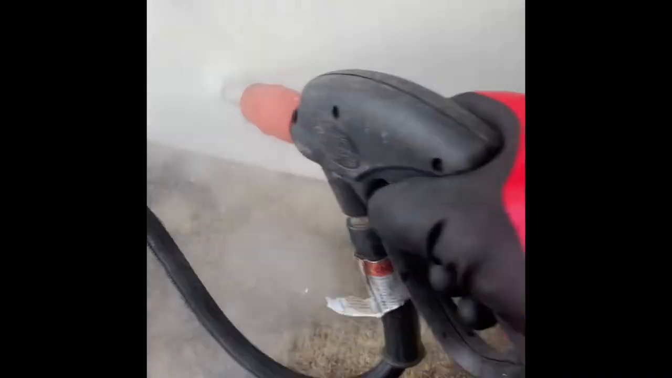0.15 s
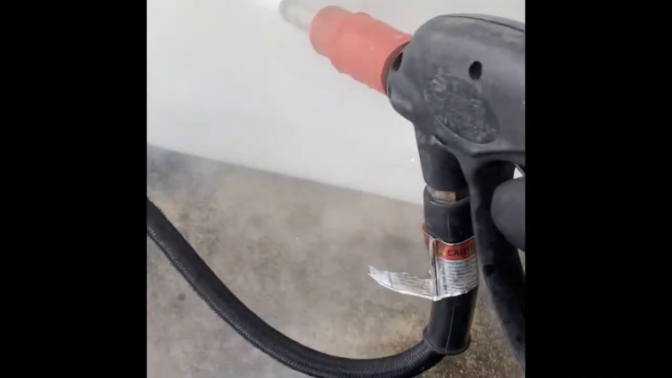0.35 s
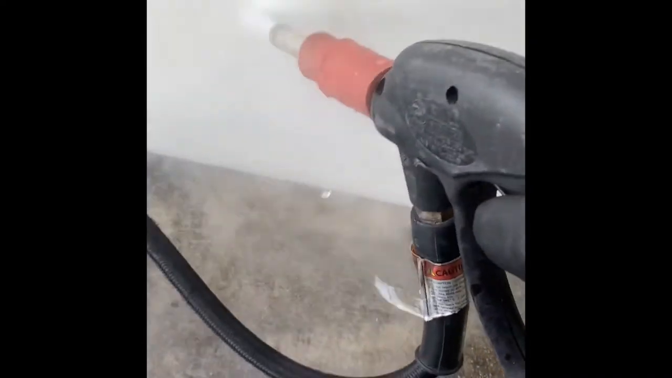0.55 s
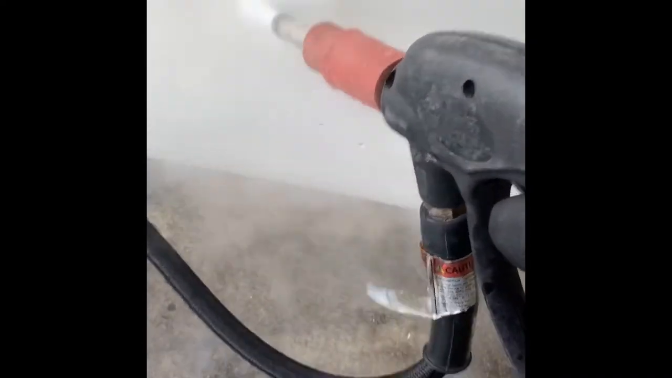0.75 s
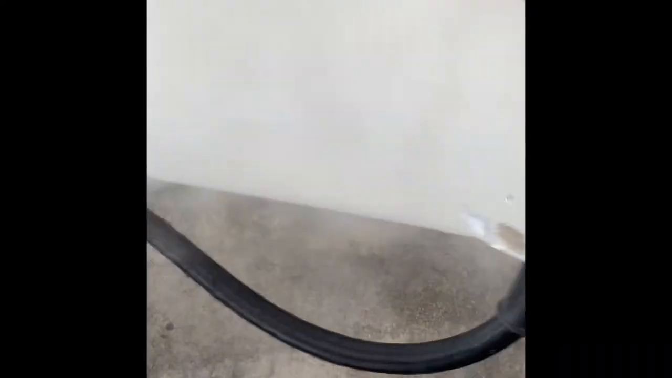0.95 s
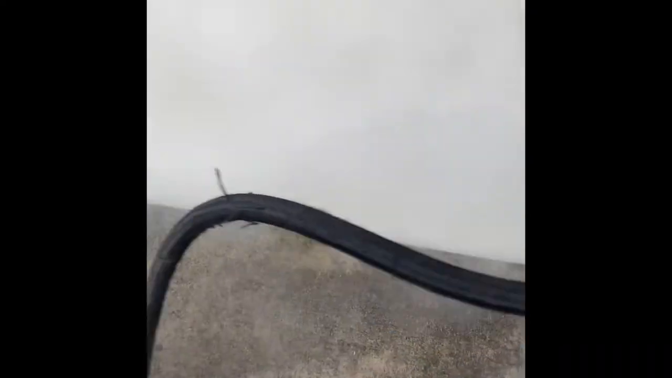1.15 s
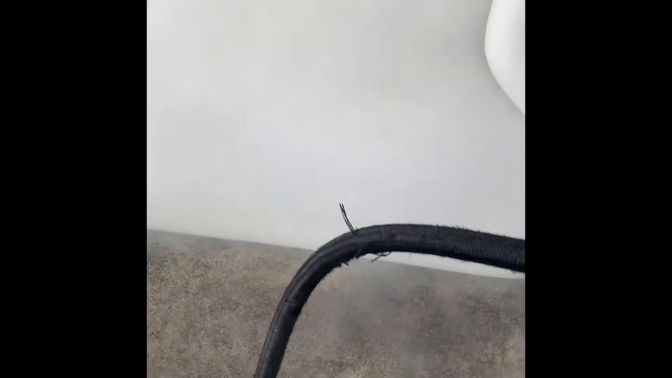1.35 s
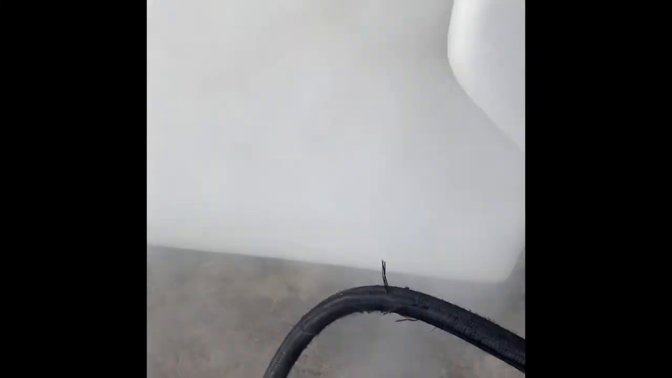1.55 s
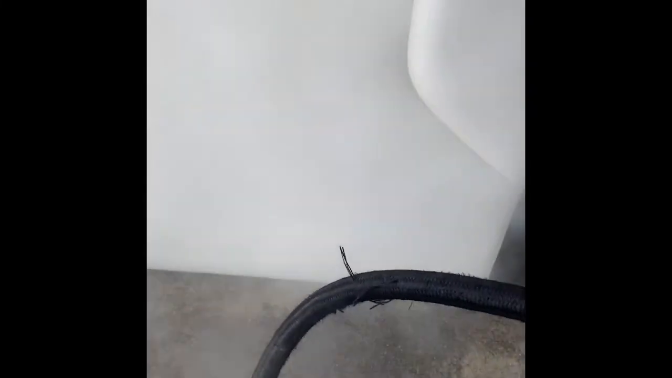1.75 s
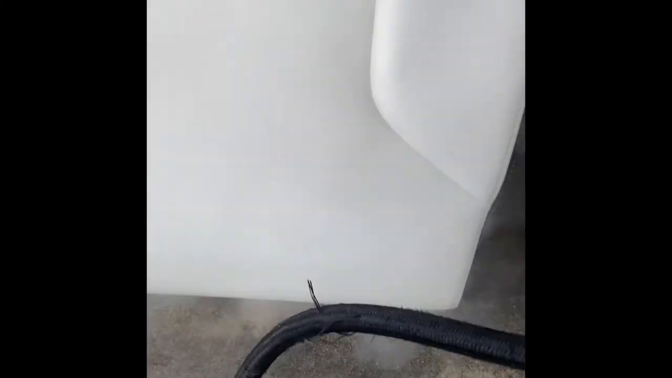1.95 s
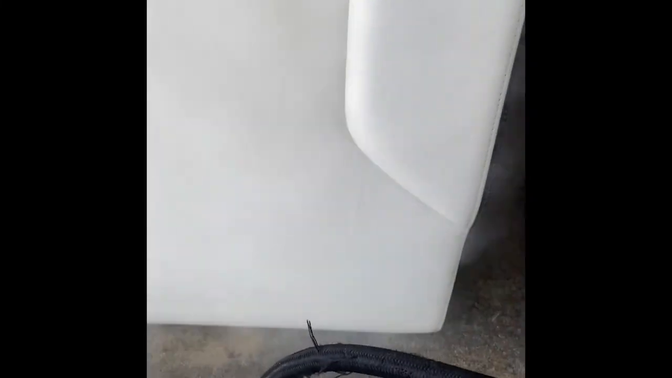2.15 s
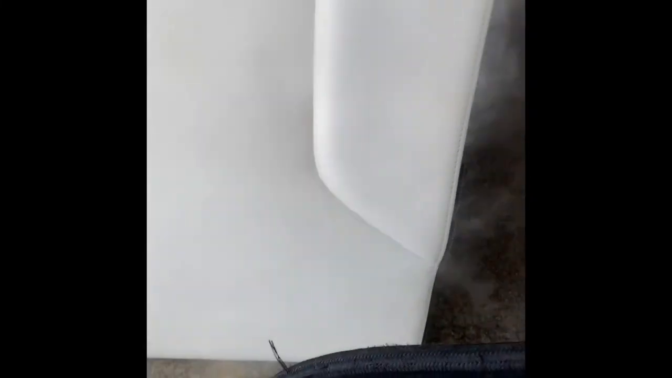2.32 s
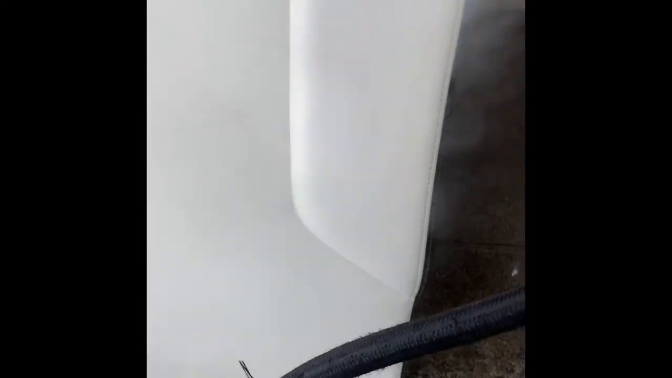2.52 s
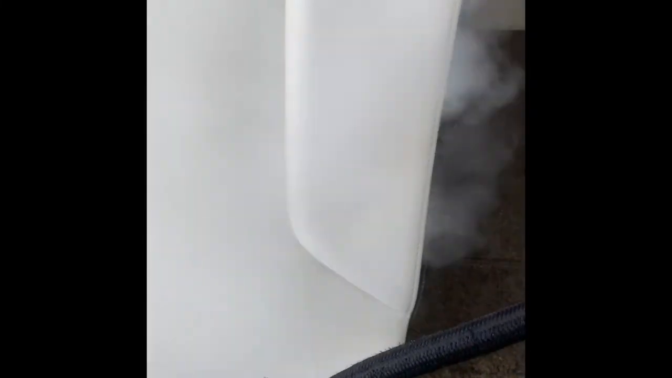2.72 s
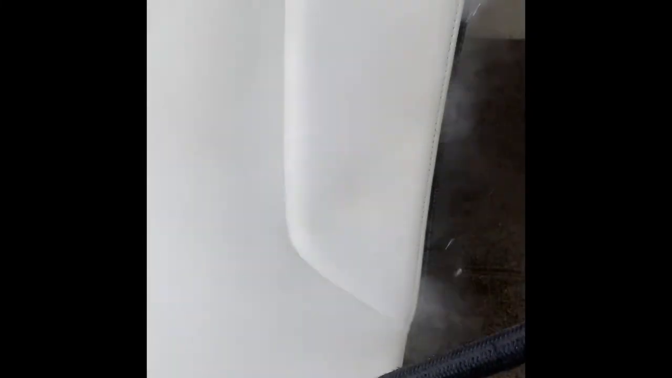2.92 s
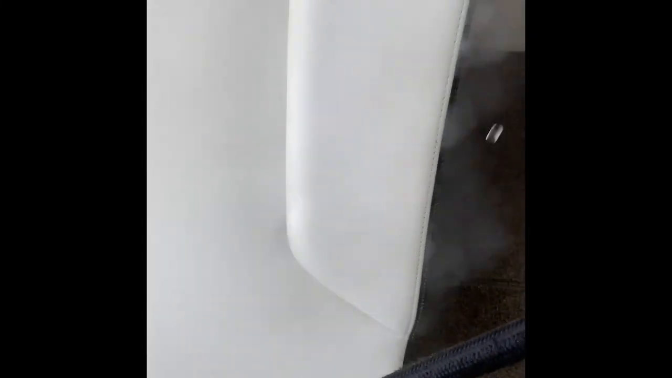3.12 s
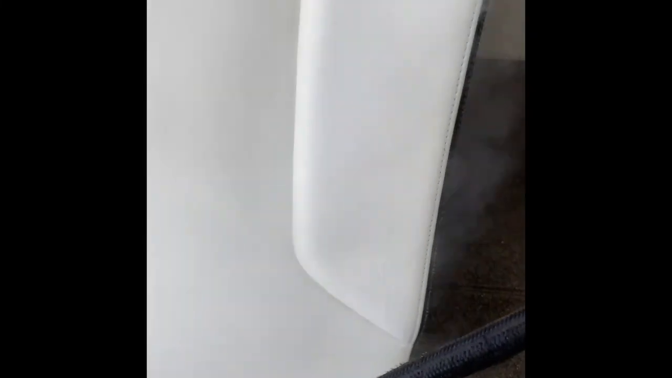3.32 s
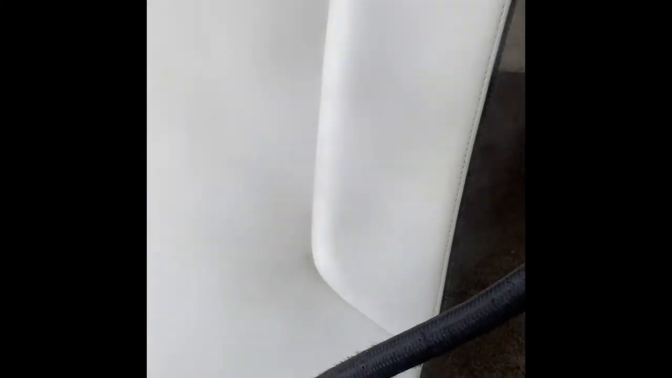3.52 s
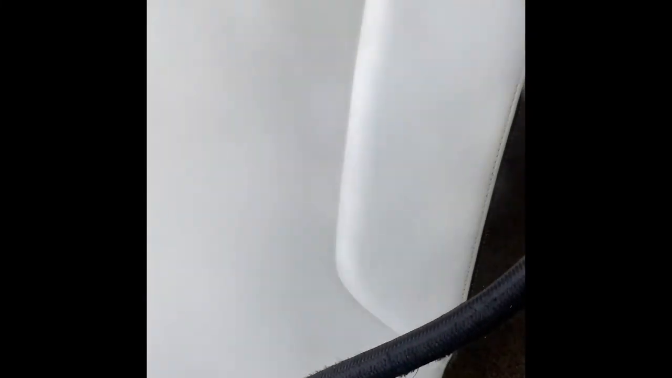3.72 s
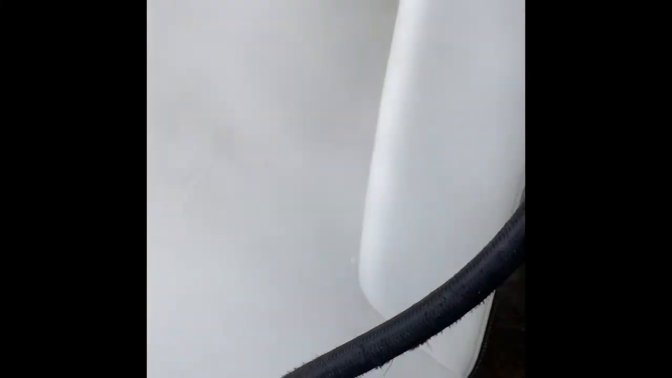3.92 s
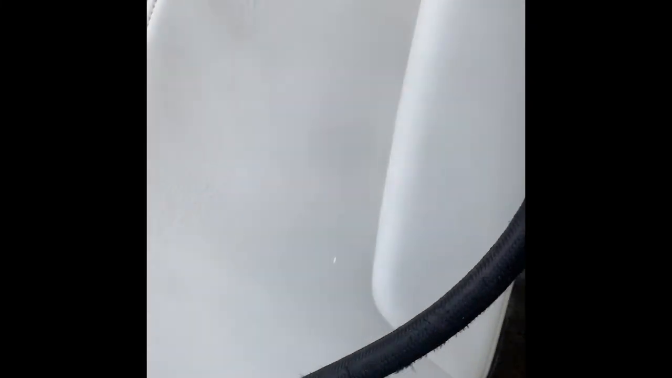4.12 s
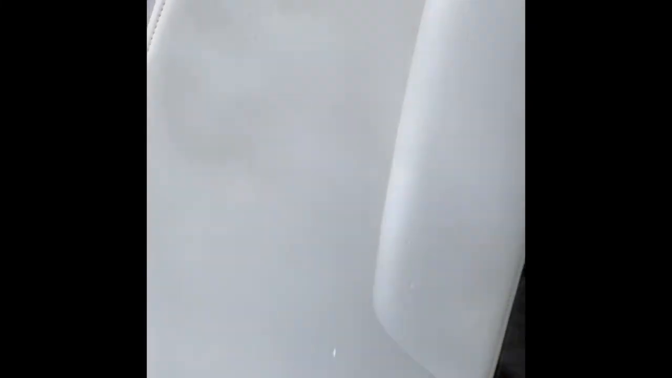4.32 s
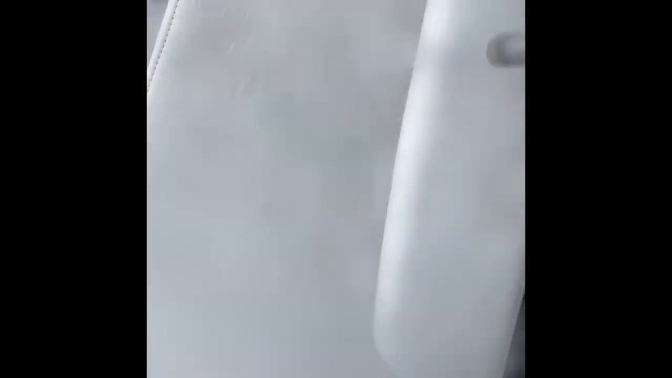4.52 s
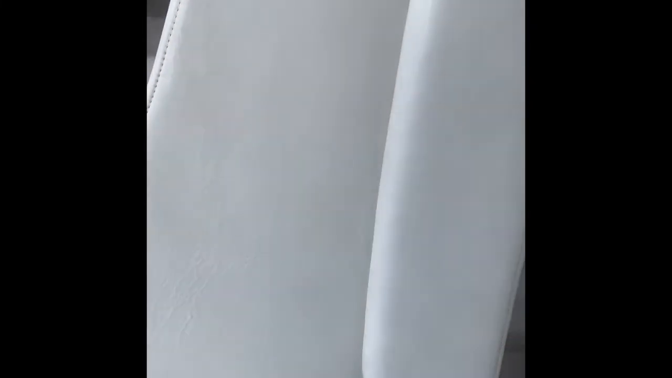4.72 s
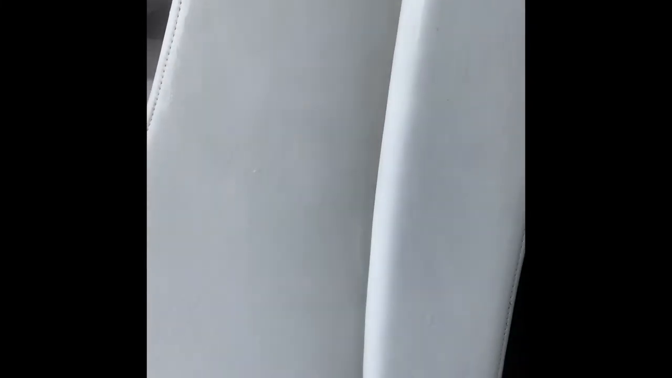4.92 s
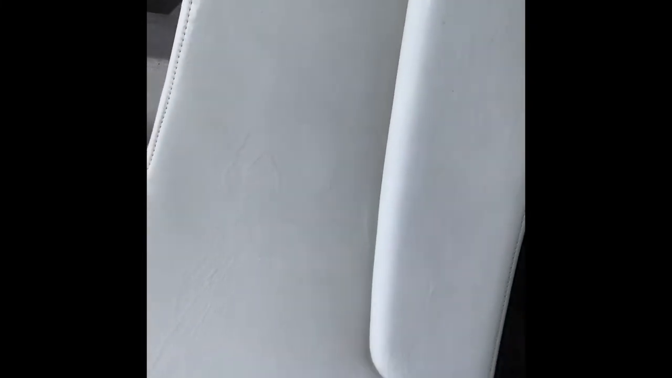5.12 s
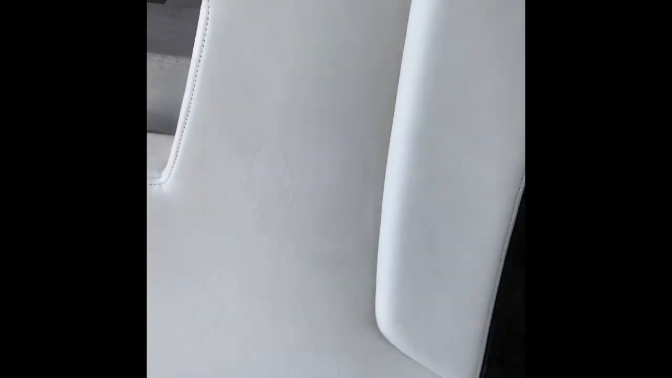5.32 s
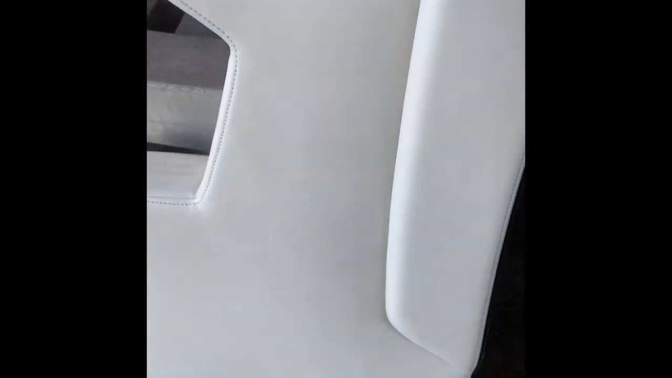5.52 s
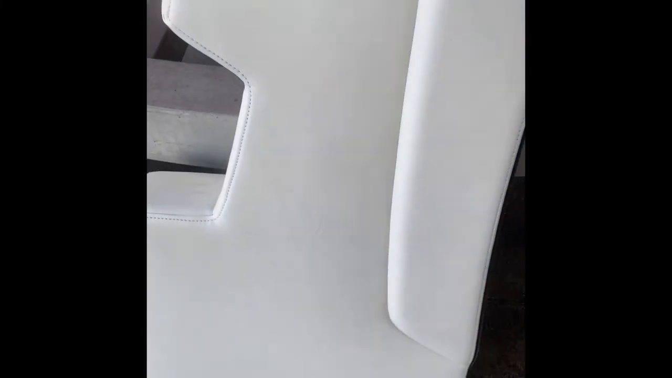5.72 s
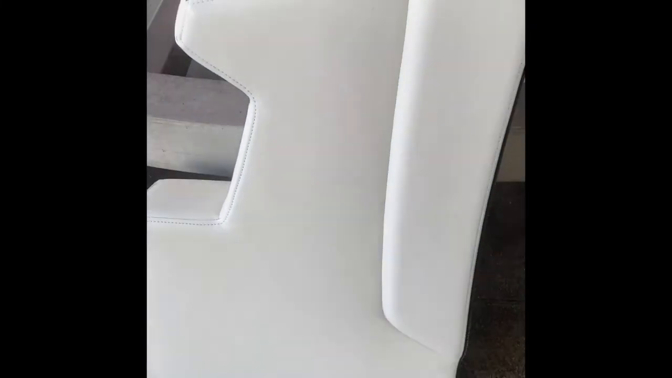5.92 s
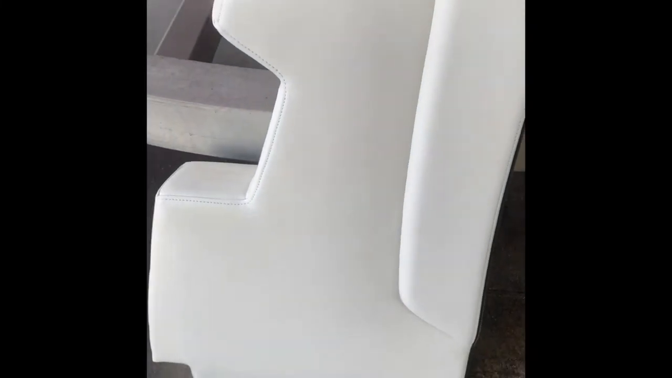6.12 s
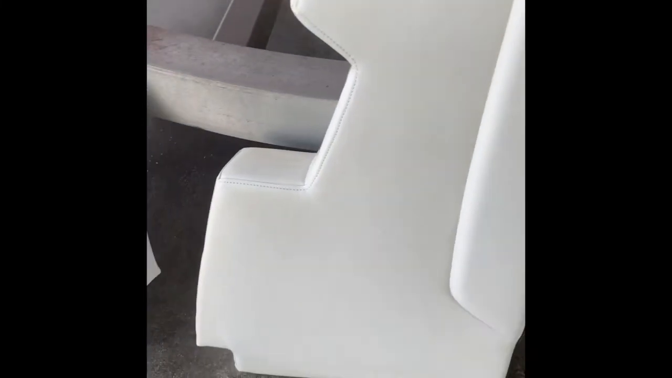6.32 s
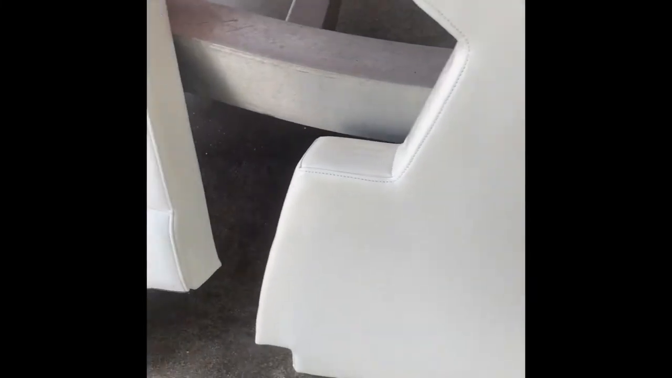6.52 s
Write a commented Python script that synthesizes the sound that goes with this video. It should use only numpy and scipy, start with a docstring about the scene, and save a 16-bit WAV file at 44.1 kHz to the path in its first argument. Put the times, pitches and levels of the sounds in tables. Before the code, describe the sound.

Harsh pressurised steam sprays against a padded panel, wavering and growing duller, then abruptly stops; a quiet yard with distant machine rumble and handling knocks remains.

```python
"""A steam jet hisses, sizzles and splashes on a padded panel close to a moving phone, until its valve shuts.
The jet is white noise shaped into bands, with shifting patches, bright bands and two reflections.
Its spreading cloud adds a dull roar. Short rings with noise cracks make the puffs, ticks and knocks.
Behind it all, a machine's rumble and the yard sound are coloured noise that wavers; faint rustles
are swells of such noise."""
import sys
import numpy as np
from scipy import signal
from scipy.fft import rfft, irfft
from scipy.io import wavfile
from scipy.ndimage import uniform_filter1d, map_coordinates

SR = 44100
rng = np.random.default_rng(int(sys.argv[2]) if len(sys.argv) > 2 else 0)


def inscribe(sig):
    """Save sig as 16-bit PCM at rate SR to the path in sys.argv[1].

    A 1-D sig is mono; a 2-D sig holds one channel per row.
    Samples are clipped to [-1, 1] before scaling.
    """
    pcm = np.round(np.clip(np.atleast_2d(sig).T, -1, 1) * 32767)
    wavfile.write(sys.argv[1], SR, pcm.astype(np.int16))


N = 293485
WIN, HOP = 1024, 128  # short-time spectrum: window and step in samples
SHUT_S = 4.4706  # when the valve starts to shut, in seconds

# How far diffuse yard sound differs between the two ports of the phone.
# Each row: frequency in Hz, relative strength of the difference in dB.
YARD_SIDE = [(100, 4.5), (450, 6.5), (700, 13), (1500, 9), (1750, -0.5), (2000, -2.5), (2400, 3.5),
             (4000, 5)]


def jet():
    """Turbulent steam is broad noise; reflections and the shutting valve shape it on its way to two ports."""
    # Colour of the phone's ports. Each row: frequency in Hz, gain in dB.
    port_colour = [(30, -9), (100, 0.5), (160, 2), (280, 0), (450, -0.5), (650, 3), (1000, -1.5), (2200, 0),
                   (2700, 0), (3300, -0.5), (4900, 0.5), (5600, 3.5), (9000, 5.5), (12000, 4.5),
                   (14000, 4.5), (16000, 3)]
    hz, s, common = frames()
    left, right = frames()[2], frames()[2]
    power = jet_power(hz, s)
    patchy_db = drifting(hz, s)
    patchy_db = patchy_db + 1.3 * patches(power.shape, 29.0, 300.0)
    # quick wide flutter from wet slugs in the flow
    patchy_db = patchy_db + 0.9 * patches(power.shape, 25.0, 4200.0)
    colour_db = across(hz, port_colour)[0] + patchy_db + slides(hz, s)
    gain = np.sqrt(power) * undb(colour_db) * valve(s) * reflections(hz, s)
    return sound(gain * two_ports(hz, s, common, left, right))


def jet_power(hz, s):
    """Splits the jet into hiss, sizzle, splash, wash, roar and buffet, each a bell-shaped band of noise."""
    # The jet as gun and phone move. Each row: time in seconds, centre of the hiss in Hz,
    # then the relative levels of hiss, sizzle and splash in dB.
    motion = [(0.0, 6660, -35.5, -37.5, -44), (0.23, 7500, -46, -35, -41), (0.39, 7650, -37, -33.5, -38),
              (0.45, 7300, -31, -38, -43.5), (0.62, 8160, -39, -36.5, -39.5), (0.75, 7800, -34, -35, -41),
              (0.95, 7160, -31, -33, -37), (1.19, 7450, -25.5, -32.5, -33.5),
              (1.22, 7200, -31.5, -35.5, -37.5), (1.29, 7700, -55, -33.5, -40),
              (1.4, 7850, -29, -35, -34.5), (1.65, 5900, -28, -31.5, -36.5),
              (1.87, 6300, -34, -34.5, -34.5), (2.04, 7000, -30, -31.5, -34.5),
              (2.5, 6600, -36.5, -34.5, -37.5), (2.71, 6750, -26, -37, -36), (2.8, 6800, -34.5, -35, -37.5),
              (3.17, 7200, -35.5, -34.5, -36.5), (3.5, 6460, -36.5, -31.5, -37),
              (3.71, 6900, -26.5, -37, -38.5), (3.8, 6200, -34.5, -31.5, -37),
              (4.08, 6800, -32.5, -34, -39), (4.3, 6850, -29, -33.5, -32), (4.37, 7000, -31.5, -34, -37),
              (4.49, 7840, -28, -28.5, -40.5)]
    # Steam cloud spreading round the panel. Each row: time in seconds, thickness from 0 to 1.
    cloud_table = [(0, 0.17), (.9, 0), (1.5, 0.17), (1.75, 0.31), (2.25, 0.16), (2.75, 0.48), (3.3, 0.97),
                   (4.1, 0.95), (4.45, 0.72)]
    hiss_hz, hiss_db, sizzle_db, splash_db = over_time(s, motion)
    cloud = over_time(s, cloud_table)[0]
    since = s - SHUT_S
    sizzle_db = sizzle_db + ramp(since, 0.061, 0.25, 0, -4.5)  # falls further during the dribble
    # the wash also rises and falls with the splash, 0.39 dB for each dB
    wash_db = between((-50, -39), cloud) + 0.39 * (splash_db - splash_db.mean())
    roar_db = between((-64, -47.5), cloud)
    # Each row: centre in Hz, width in octaves, relative level in dB, further change in dB on shutting.
    bands = [(hiss_hz, 0.33, hiss_db - 5.5, -17),
             (10500, 0.45, sizzle_db + 3, 3.5),
             (3600, 0.45, splash_db + 3, 4.5),
             (1500, 0.5, wash_db + 1, -4),
             (230, 1.1, roar_db + 1.5, -11),
             (68, 0.42, roar_db - 5.5, -10.5)]  # buffet: slow eddies that come with the roar
    power = 0
    for centre_hz, octaves, level_db, shut_db in bands:
        power = power + band(hz, centre_hz, octaves, level_db + ramp(since, 0, 0.061, 0, shut_db))
    return power


def valve(s):
    """Shutting the valve gives a quick drop, a short dribble from the nozzle and a fading tail."""
    # Each row: seconds since the valve starts to shut, gain in dB.
    shut_off = [(0, 0), (.05, -17), (.1, -25.5), (.135, -29), (.165, -39.5), (.28, -49.5), (.32, -55),
                (.55, -70)]
    since = s - SHUT_S
    return undb(over_time(since, shut_off)[0]) * (since < shut_off[-1][0])


def two_ports(hz, s, common, left, right):
    """Sound shared by left and right has a phase lead on one side; the rest differs from side to side."""
    # The likeness of left and right. Each row: frequency in Hz, shared part of the power (0 to 1) before # and
    # after the phone turns, phase lead of the left in radians before and after the turn, # left minus right
    # level in dB.
    likeness = [(60, .95, .62, -.5, 0, -1.5), (142, .8, .6, -.5, 0, -3), (295, .88, .95, -.8, 0, -1),
                (430, .35, .8, -1.7, 0, -2), (550, .2, .8, -2.3, -.4, -2.5),
                (700, .2, .62, -2.4, -.5, -2.5), (950, .15, .45, -2.3, .2, -1), (1300, .4, .75, 0, .2, 0),
                (1800, .5, .9, .45, .2, .5), (2350, .4, .45, .8, .5, 0), (2850, .5, .2, 3.6, 3.1, -1.5),
                (3300, .45, .12, 3.9, 3.1, -1.5), (3900, .15, .3, 1.5, 1.1, -1.5),
                (4500, .4, .4, 1.9, 1.4, -1), (5000, .35, .05, -1.5, -.5, -.5),
                (5500, .82, .68, .1, .35, -.5), (6200, .84, .77, .5, .6, 0), (7600, .77, .7, 1.15, 1.2, .5),
                (8500, .79, .74, 1.6, 1.7, .5), (10500, .78, .74, 2.3, 2.4, 1.5),
                (11500, .82, .85, 2.8, 2.9, 0)]
    # The same columns for the top, where left and right are of opposite sign.
    opposed = [(12300, .995, .995, .97 * np.pi, .97 * np.pi, 0), (13000, 1, 1, np.pi, np.pi, 0),
               (20000, 1, 1, np.pi, np.pi, 0)]
    swing = np.interp(s, (2.0, 2.65), (0, 1))  # the phone turns
    early, late, lead_early, lead_late, pan_db = across(hz, likeness + opposed)
    share = np.clip(between((early, late), swing), 0, 1)
    turn = np.exp(0.5j * between((lead_early, lead_late), swing))
    left_port = np.sqrt(share) * turn * common + np.sqrt(1 - share) * left
    right_port = np.sqrt(share) / turn * common + np.sqrt(1 - share) * right
    return np.array([undb(pan_db / 2) * left_port, undb(-pan_db / 2) * right_port])


def reflections(hz, s):
    """Two delayed copies carve comb-like teeth into the spectrum, which glide as the delays change."""
    # Reflections off panel and floor as the phone moves. Each row: time in seconds, near delay
    # in milliseconds, near strength (0 to 1), far delay in milliseconds, far strength (0 to 1).
    echo = [(0, 0.7, 0.3, 3.7, 0.1), (.12, 0.98, 0.05, 2.1, 0.15), (.25, 1.14, 0.05, 2.5, 0.1),
            (.39, .85, 0.2, 2.3, 0.08), (.55, .8, 0.15, 2.4, .08), (0.73, 0.95, 0.1, 2.4, .08),
            (.95, 1.18, 0.12, 2.1, 0.06), (1.2, 1.3, 0.05, 2, 0.06), (1.24, .38, 0, 1.9, 0),
            (1.5, 0.41, 0.1, 2.2, 0.15), (1.7, 0.44, 0.15, 2.1, 0.15), (2.3, 0.53, 0, 2, 0.03),
            (2.6, 0.29, 0.06, 4, 0.15), (3.7, 0.29, 0.2, 5.9, 0.15)]
    near_ms, near, far_ms, far = over_time(s, echo)
    cycle = -2j * np.pi * hz[:, None] / 1000  # phase per millisecond of delay
    combed = 1 + near * np.exp(cycle * near_ms) + far * np.exp(cycle * far_ms)
    return combed / np.sqrt(1 + near ** 2 + far ** 2)


def slides(hz, s):
    """Bright bands and hollows fade in and out of the jet, some gliding in pitch; in dB."""
    # Each row: start and end in seconds, first and last frequency in Hz, width in Hz, lift in dB
    # (below 0 is a hollow). Equal start and end leave no band; an end before the start runs it backwards.
    glides = [(-.2, 0.97, 454, 460, 45, -16), (0.2028, 0.898, 1554, 1560, 88.7, -5.5),
              (-0.1, .3, 6200, 5640, 180, 7.5), (-0.5, 0.21, 9500, 8000, 300, 4),
              (0.05, 0.22, 8200, 6400, 280, 5), (0, 0.3, 10300, 10700, 220, 4),
              (.3, 0.43, 10800, 10100, 250, 4.5), (.2, .36, 9200, 9200, 250, 4),
              (.24, 0.433, 8440, 7700, 320, 5), (.3, 0.521, 7800, 6300, 300, 0.5),
              (0.438, 0.65, 7820, 8300, 300, 8), (0.7, .7, 8700, 8400, 280, 5.5),
              (0.422, 0.682, 10800, 10340, 350, 6.5), (0.555, 0.804, 5400, 6800, 280, 5.5),
              (0.613, 0.782, 9400, 9700, 300, 5.5), (.7, .98, 8300, 6470, 450, 3.5),
              (0.737, .92, 10200, 11100, 350, 3), (.92, 1.121, 5370, 4740, 280, 2.5),
              (.98, 1.464, 2930, 2880, 220, 4), (1.13, 1.25, 3830, 3850, 250, 3.5),
              (1.205, 1.483, 10590, 10500, 500, 5), (1.299, 1.52, 7700, 8200, 300, 7.5),
              (1.4479, 1.597, 4636, 5050, 300, 6), (1.56, 1.713, 5057, 4700, 300, -1),
              (1.579, 1.802, 4122, 3960, 220, 5), (1.66, 1.86, 11000, 10150, 350, 4.5),
              (1.68, 1.842, 9890, 9700, 250, 1.5), (1.36, 1.52, 10940, 11800, 350, 3),
              (1.679, 1.819, 8000, 7720, 250, 3), (1.6, 2.05, 5700, 5500, 200, 2.5),
              (.53, .66, 8940, 8700, 220, 2.5), (.5, .62, 4700, 4540, 200, 4.5),
              (0.5, 1.02, 9500, 8900, 280, 3.5), (2.002, 2.185, 5000, 5140, 220, -4.5),
              (2, 2.32, 9200, 8600, 220, 5.5), (1.449, 1.85, 3400, 3170, 220, 7.5),
              (1.58, 1.818, 6290, 5890, 250, 5.5), (1.7, 3.5, 2953, 2935, 200, 2),
              (2.003, 2.32, 6600, 6000, 350, 3), (2.42, 2.68, 9000, 9300, 300, 4.5),
              (3.498, 4.05, 3420, 3170, 280, 2), (3.5, 3.953, 6280, 6400, 500, 3.5),
              (4.153, 4.452, 3290, 3400, 300, -1.5), (4, 4.36, 1900, 2000, 450, 3),
              (5, 4.58, 1600, 1200, 550, 4.5), (5, 4.66, 7700, 7000, 900, -2),
              (1.6, 1.62, 6300, 6100, 450, 2.5), (1.7, 2.3, 600, 560, 90, 3.5),
              (0.1, 1.4, 1150, 1300, 150, 2.5)]
    lift_db = 0
    for start, end, from_hz, to_hz, width_hz, db in glides:
        along = np.clip((s - start) / (end - start), 0, 1)
        centre_hz = from_hz + (to_hz - from_hz) * along
        fade = np.sqrt(np.abs(np.sin(np.pi * along)))
        bell = np.exp(-0.5 * ((hz[:, None] - centre_hz) / width_hz) ** 2)
        lift_db = lift_db + db * fade * bell
    return lift_db


def drifting(hz, s):
    """Slow narrow patches in dB slide in pitch as the paths off the panel change length."""
    # Each row: time in seconds, shift in octaves, depth in dB.
    drift = [(0, .45, 2.2), (.4, -.15, 2.2), (.75, .15, 2), (1.2, -.3, 1.6), (1.55, -.1, 1.5),
             (1.9, -.3, 1.4), (2.7, -.15, 1.1), (4.5, -.35, 1.1)]
    octaves, depth_db = over_time(s, drift)
    rows = np.arange(len(hz))[:, None] / 2 ** octaves
    columns = np.broadcast_to(np.arange(len(s)), rows.shape)
    pattern = patches(rows.shape, 6, 260)
    return depth_db * map_coordinates(pattern, [rows, columns], order=1, mode="mirror")


def ticks():
    """Puffs on the ports, small ticks and fingers shifting on the case: a short ring with a crack of noise."""
    # Each row: start in seconds, level in dB, ring pitch in Hz, time for the ring to fall 60 dB in seconds,
    # strength of the crack beside the ring, sign of the right port (1 through the air, -1 through the case).
    hits = [(3.362, -29.5, 79.5, 0.037, 0.05, 1), (3.665, -41, 95.1, 0.032, 0.039, 1),
            (5.174, -72, 1800, 0.012, 1.9, 1), (5.486, -80, 2600, .01, .5, 1),
            (5.565, -80, 2500, .01, .5, 1), (5.698, -77, 2200, .01, .6, 1),
            (5.996, -74, 3100, 0.012, 3.5, 1), (5.998, -76, 1800, .012, 1, 1),
            (6.291, -46, 105, 0.07, .3, -1), (6.296, -60, 420, 0.033, 0.18, -1),
            (6.328, -59, 402, .03, 0.21, -1), (6.372, -49, 100, .08, .4, -1),
            (6.374, -55, 440, .03, .2, -1), (6.479, -43, 105, .07, .25, -1), (6.51, -63, 330, .03, .2, -1),
            (6.535, -61, 480, 0.037, .1, -1), (6.566, -48, 100, .08, .4, -1),
            (6.61, -60, 350, 0.036, .2, -1), (6.622, -48, 105.4, 0.06, 0.3, -1)]
    out, t = np.zeros((2, N)), np.arange(4000) / SR
    cracks = rng.standard_normal((len(hits), len(t)))
    sink_s, crack_s = 0.0019, 0.002  # time constants in seconds
    for (s, db, hz, t60, share, sign), crack in zip(hits, cracks):
        # a ring below 250 Hz starts sharp and sinks to its pitch
        bend = (hz < 250) * 2.7 * sink_s * (1 - np.exp(-t / sink_s))
        ring = np.sin(2 * np.pi * hz * (t + bend))
        ring = ring * np.exp(-np.log(1000) * t / t60)
        ring = ring * np.minimum(2 * t * hz, 1)  # fades in over half a cycle
        dull = 2 if hz > 1000 else 7  # smoothing in samples
        crack = uniform_filter1d(uniform_filter1d(crack, size=dull), size=dull)
        crack = crack * np.exp(-t / crack_s)
        i = int(s * SR)
        hit = (ring / np.abs(ring).max() + share * crack)[:N - i]
        out[:, i:i + len(hit)] += hit * undb(db) * np.array([[1], [np.sign(sign)]])
    return out


def rustles(t):
    """Faint rustles are brief swells of coloured noise over a still fainter steady bed."""
    # Each row: frequency in Hz, relative strength in dB.
    colour = [(1200, -22.5), (1700, -8.5), (2000, -9.5), (2350, -0.5), (2800, 2.5), (3300, -4.5),
              (3700, -9), (4200, -5.5), (4700, -14), (6000, -33)]
    # Each row: time of the peak in seconds, level in dB, half-length in seconds.
    swell_table = [(5.121, -94, .05), (5.211, -93, 0.04), (5.35, -86.5, .07), (5.43, -92, 0.025),
                   (5.69, -95, 0.04), (5.9, -93, .03), (6.01, -92, 0.035)]
    swells = undb(-100)
    for s, db, length in swell_table:
        swells = swells + undb(db) * np.exp(-((t - s) / length) ** 2)
    return background(colour, 0, 6.1, -0.4, 1.5) * swells


def machine_rumble(t):
    """A machine's rumble is low coloured noise; its deepest part comes up in the quiet."""
    # Each colour row: frequency in Hz, relative strength in dB.
    rumble_colour = [(25, -32), (43, -22.5), (60, -7), (75, -5), (90, 2.5), (105, -3.5), (120, 0),
                     (140, -14.5), (170, -27.5), (200, -29), (250, -41.5), (300, -71.5)]
    deep_colour = [(20, -34), (35, -15), (55, 3), (75, 5.5), (95, -14), (130, -46), (200, -100)]
    # Each row: time in seconds, level in dB.
    rumble_level = [(0, -63.5), (5.04, -60.5), (5.2, -54), (5.5, -51), (5.9, -54.5), (6.15, -49.5),
                    (6.6, -60.5)]
    rumble = background(rumble_colour, over_time(t, rumble_level)[0], -8.5, 3.8, 1.8)
    deep = background(deep_colour, ramp(t, 4.5, 6, -80.5, -63), -11.5, 4.5, 1.4)
    return rumble + deep


def low_thrum(t):
    """A narrow band of low noise starts louder, settles, then comes up again."""
    # Each row: frequency in Hz, relative strength in dB.
    colour = [(100, -24.5), (150, 5), (175, 13), (210, -5.5), (280, -51)]
    level_db = ramp(t, 3.5, 6.5, -82, -70) + ramp(t, -1.5, 5, 11.5, -2.5)
    return background(colour, level_db, -7.5, 2.6, 2.6)


def yard_air(t):
    """Diffuse yard sound is coloured noise that differs between the ports."""
    # Each row: frequency in Hz, relative strength in dB.
    colour = [(100, -17), (250, 2), (350, -9), (460, -5), (580, -9.5), (670, -1.5), (730, -13.5),
              (1400, -12), (2000, -11.5), (2800, -20.5), (4000, -24.5), (8000, -45)]
    # Each row: time in seconds, level in dB.
    level = [(0, -81.5), (3, -94), (4.6, -85.5), (5.0, -88), (5.15, -84.5), (5.6, -83.5), (6.6, -85.5)]
    return background(colour, over_time(t, level)[0], YARD_SIDE, 0.4, 1.2)


def yard_drone(t):
    """Noise with several narrow humps drones faintly and steps up near the end."""
    # Each row: frequency in Hz, relative strength in dB.
    colour = [(200, -29.5), (300, -10), (350, -12), (410, -4.5), (455, 4), (495, -4.5), (535, -3),
              (575, -16), (620, -7), (680, -13.5), (720, -20), (790, -20.5), (840, -11.5), (890, -22.5),
              (960, -17), (1030, -24), (1390, -18.5), (1800, -40), (2500, -60.5)]
    return background(colour, ramp(t, 5.64, 5.72, -92, -79), YARD_SIDE, 1.2, 1.0)


def self_noise():
    """The phone's own noise is a faint, nearly steady hiss."""
    # Each row: frequency in Hz, relative strength in dB.
    colour = [(500, -9.5), (3000, -1.5), (5000, -2.5), (7000, -1), (10000, -10.5), (12000, -18),
              (14000, -26.5), (15000, -42)]
    return background(colour, -91, 3, 0.12, 0.3)


def background(colour, level_db, side_db, pan_db, flicker_db):
    """Diffuse noise: a part alike at both ports plus a side part of opposite sign, wavering in level.

    side_db is one relative strength in dB, or a table of it by frequency."""
    hz = np.maximum(np.arange(N // 2 + 1) * SR / N, 1)
    white = rfft(rng.standard_normal((2, N)))
    mid, side = irfft(white * undb(across(hz, colour)[0][:, 0]), N)
    if np.ndim(side_db):
        side = irfft(rfft(side) * undb(across(hz, side_db)[0][:, 0]), N)
        side_db = 0
    pair = (mid + undb(side_db) * side * np.array([[1], [-1]])) / mid.std()
    # a new random level every 4000 samples, joined by straight lines
    waver = np.repeat(rng.standard_normal(N // 4000 + 1), 4000)
    waver = uniform_filter1d(waver, 4000)[:N]
    return pair * undb(level_db + flicker_db * waver + np.array([[pan_db], [-pan_db]]) / 2)


def undb(db):
    """Turns decibels into gain."""
    return 10 ** (np.asarray(db) / 20)


def across(hz, table):
    """Reads the columns of a table along a log-frequency axis."""
    at, *columns = np.transpose(table)
    return [np.interp(np.log(hz), np.log(at), c)[:, None] for c in columns]


def over_time(s, table):
    """Reads the columns of a table along time."""
    at, *columns = np.transpose(table)
    return [np.interp(s, at, c) for c in columns]


def between(pair, share):
    """Blends from the first value to the second as share goes from 0 to 1."""
    return pair[0] + (pair[1] - pair[0]) * share


def ramp(s, start_s, end_s, before_db, after_db):
    """A level that moves once, in a straight line, from one value to another."""
    return np.interp(s, (start_s, end_s), (before_db, after_db))


def band(hz, centre_hz, octaves, db):
    """Power per bin of a noise band that is bell-shaped in octaves, scaled to the given mean power."""
    bell = np.exp(-0.5 * (np.log2(hz[:, None] / centre_hz) / octaves) ** 2)
    return bell / bell.mean(axis=0) * undb(2 * db)


def patches(shape, rate, width_hz):
    """Smooth random patches over time (rate per second) and frequency, with a spread of 1."""
    field = rng.standard_normal(shape)
    for _ in range(2):
        field = uniform_filter1d(field, max(int(SR / HOP / rate), 1), axis=1)
        field = uniform_filter1d(field, max(int(width_hz * WIN / SR), 1), axis=0)
    return field / field.std()


def frames():
    """Short-time spectrum of fresh white noise, with its frequencies and times."""
    hz, s, z = signal.stft(rng.standard_normal(N), SR, nperseg=WIN, noverlap=WIN - HOP)
    return np.maximum(hz, 1), s, z


def sound(z):
    """Turns a short-time spectrum back into samples."""
    return signal.istft(z, SR, nperseg=WIN, noverlap=WIN - HOP)[1][..., :N]


def narrowed(pair):
    """Draws the bass in to the middle: removes what is opposed at left and right below a moving edge."""
    # Each row: time in seconds, edge in Hz.
    mono_edge = [(1.52, 1), (1.57, 520), (2.1, 700), (2.55, 660), (3.0, 520), (3.5, 450), (4.45, 220),
                 (5.15, 60), (5.22, 1)]
    mid, side = (pair[0] + pair[1]) / 2, (pair[0] - pair[1]) / 2
    hz, s, z = signal.stft(side, SR, nperseg=WIN, noverlap=WIN - HOP)
    keep = hz[:, None] > over_time(s, mono_edge)[0]
    return mid + sound(z * keep) * np.array([[1], [-1]])


def scene():
    """Adds the jet, the ticks and rustles, the machine, the yard and the phone's own noise."""
    t = np.arange(N) / SR
    near = jet() + ticks() + rustles(t)
    far = machine_rumble(t) + low_thrum(t) + yard_air(t) + yard_drone(t)
    return near + far + self_noise()


def record(dry):
    """The bass narrows for a while, and a steep filter cuts the top."""
    top_hz = 15730
    top_cut = signal.ellip(14, 0.2, 80, top_hz, fs=SR, output="sos")
    return signal.sosfilt(top_cut, narrowed(dry))


dry = scene()
out = record(dry)
inscribe(out)
```